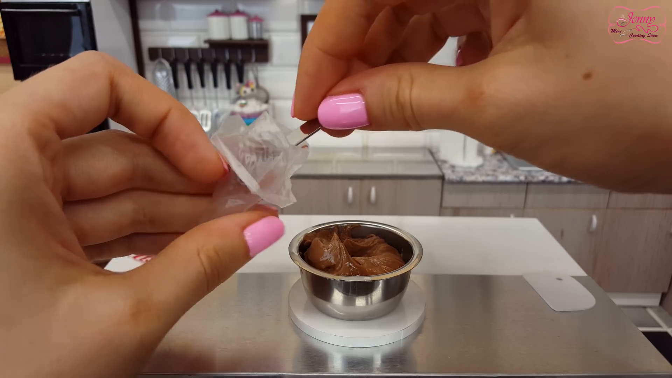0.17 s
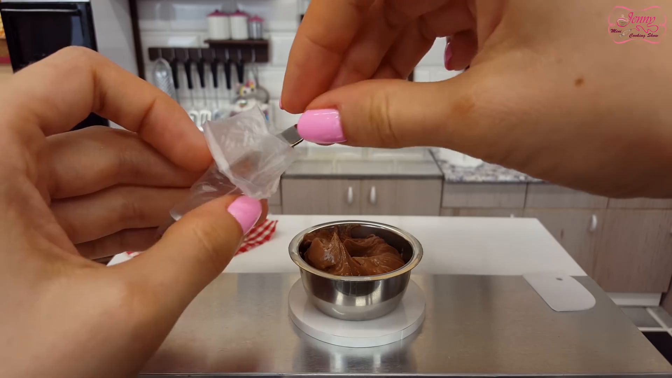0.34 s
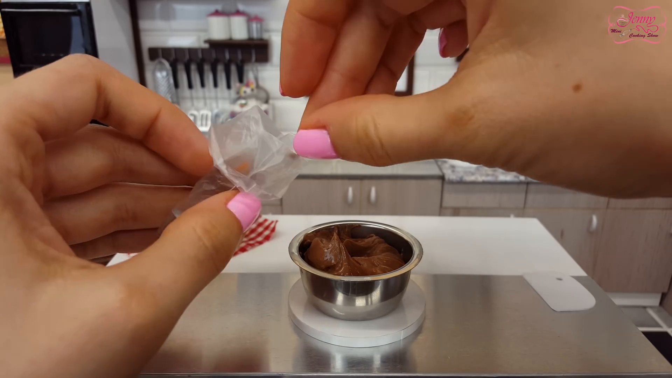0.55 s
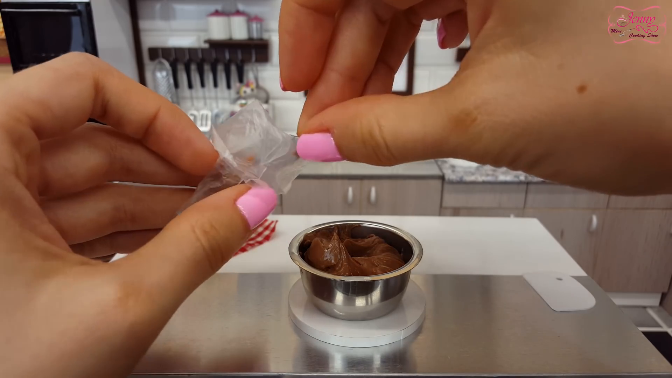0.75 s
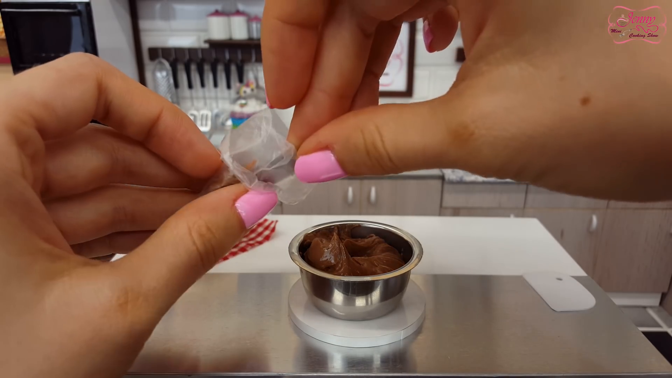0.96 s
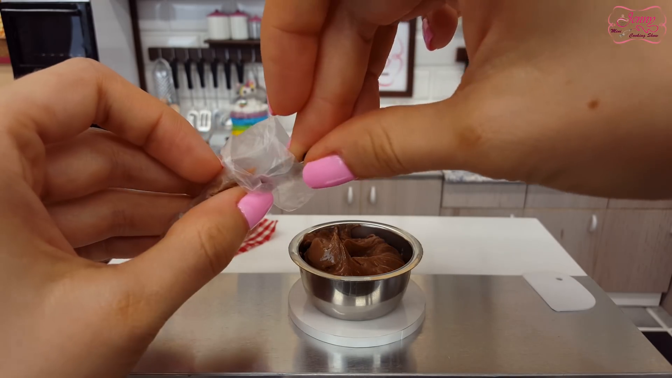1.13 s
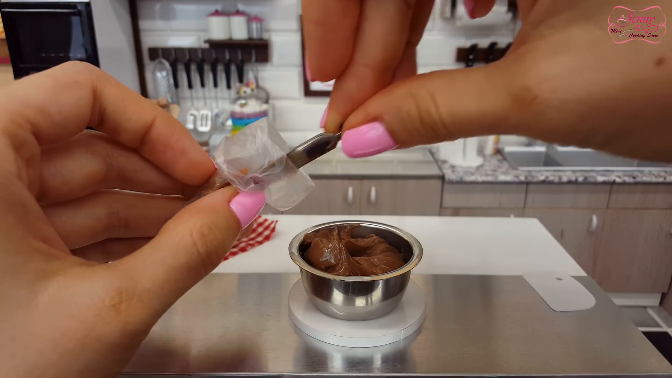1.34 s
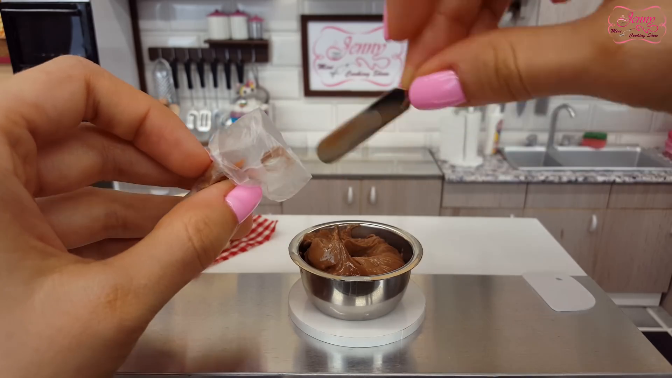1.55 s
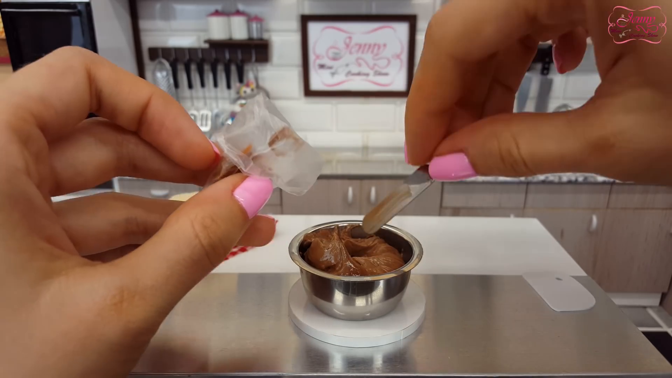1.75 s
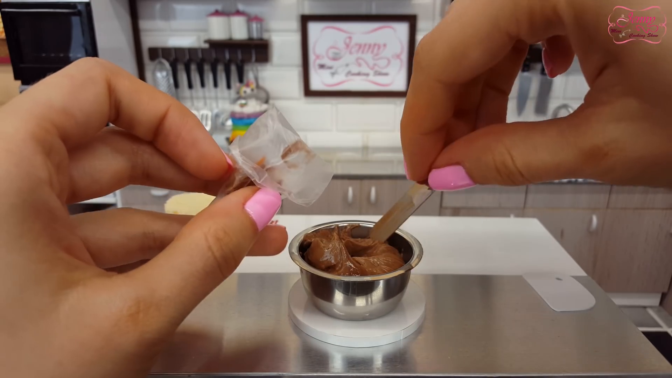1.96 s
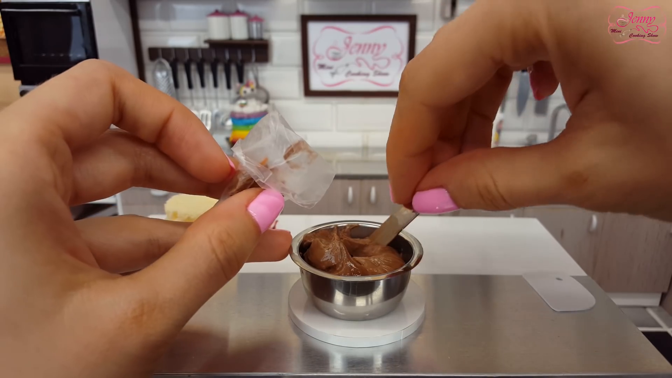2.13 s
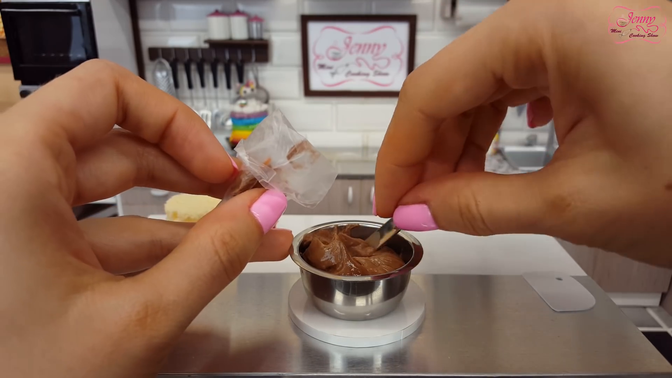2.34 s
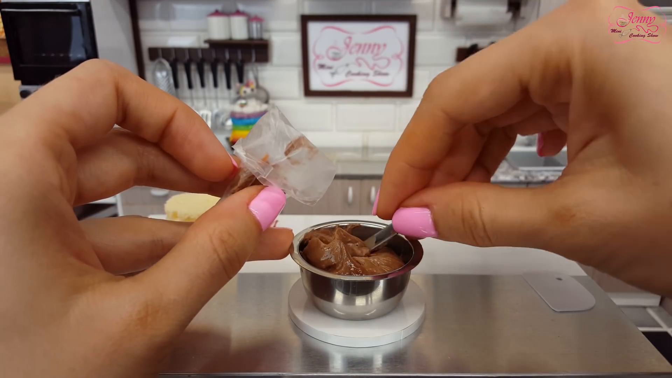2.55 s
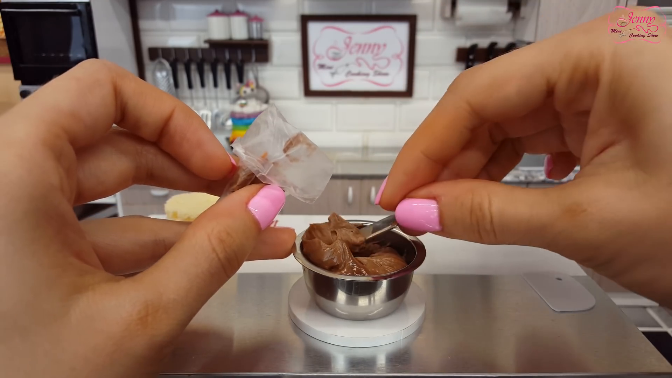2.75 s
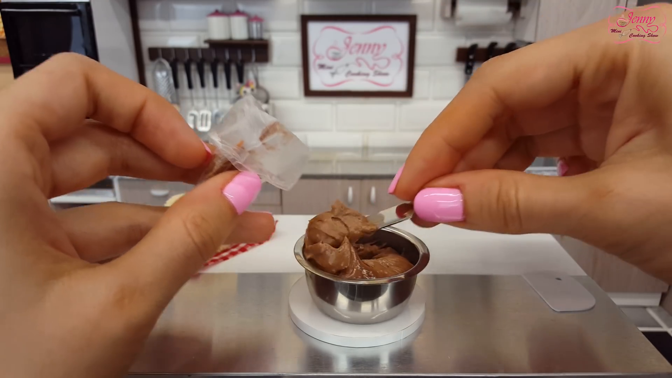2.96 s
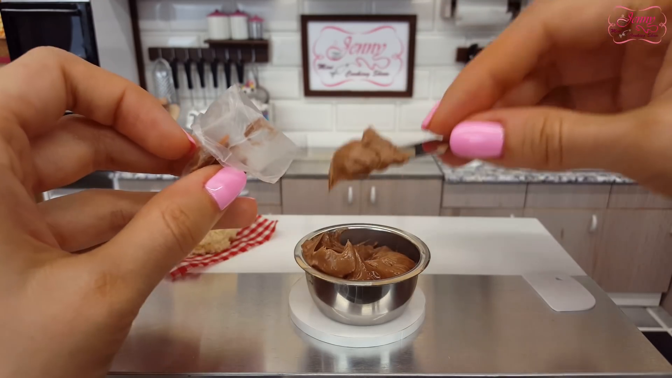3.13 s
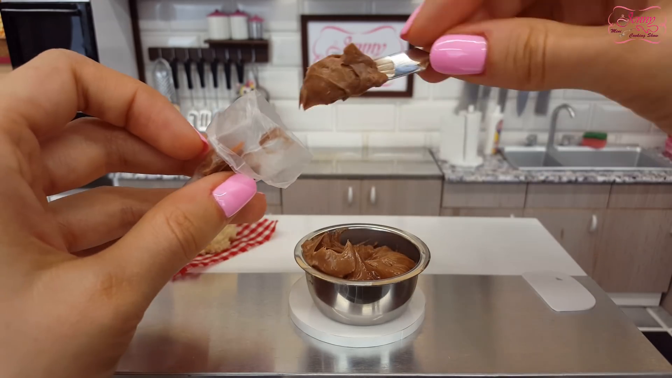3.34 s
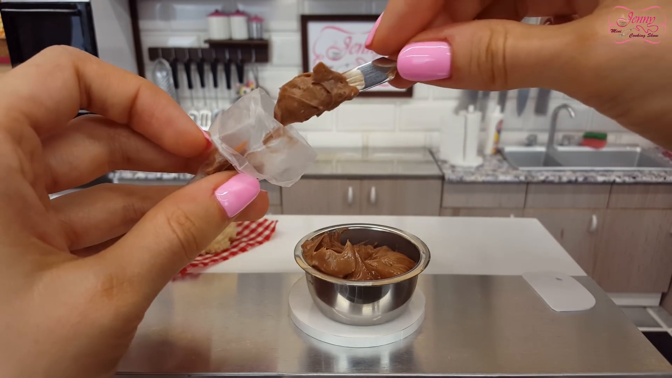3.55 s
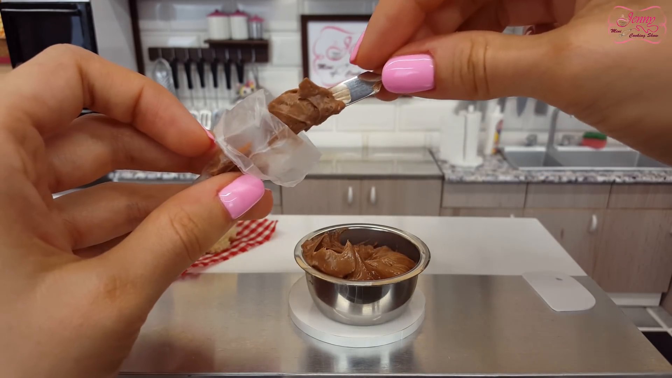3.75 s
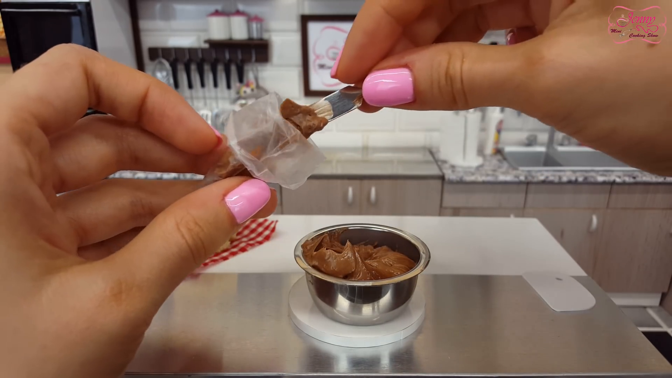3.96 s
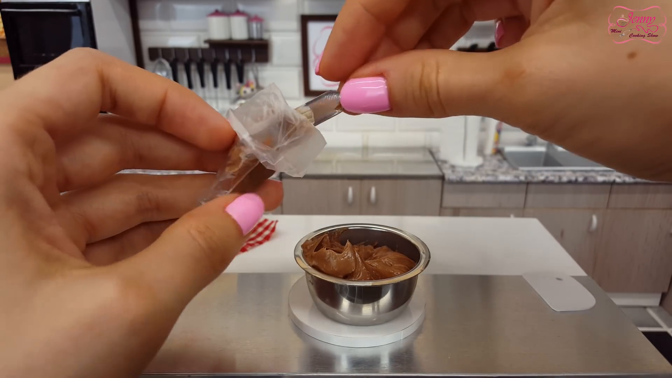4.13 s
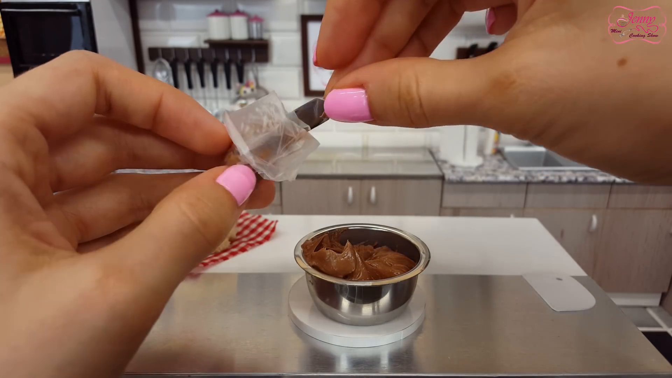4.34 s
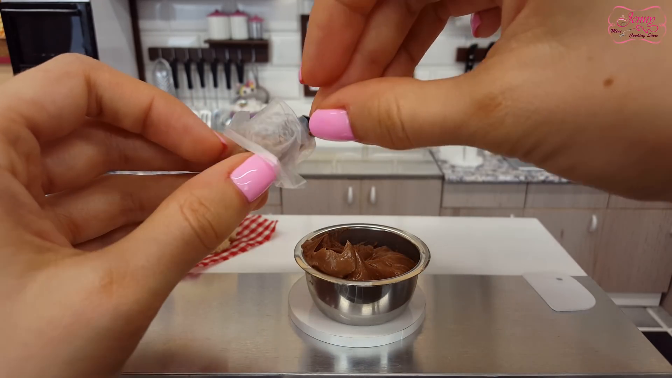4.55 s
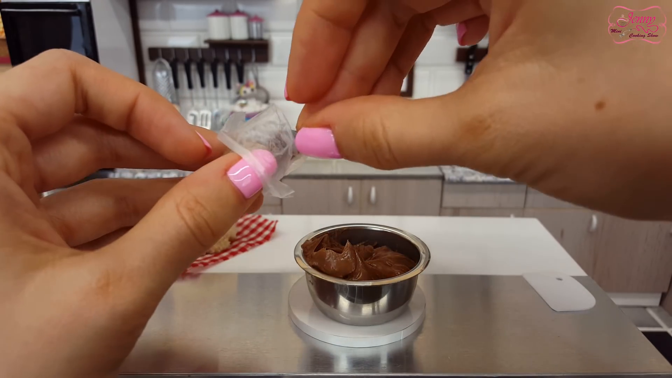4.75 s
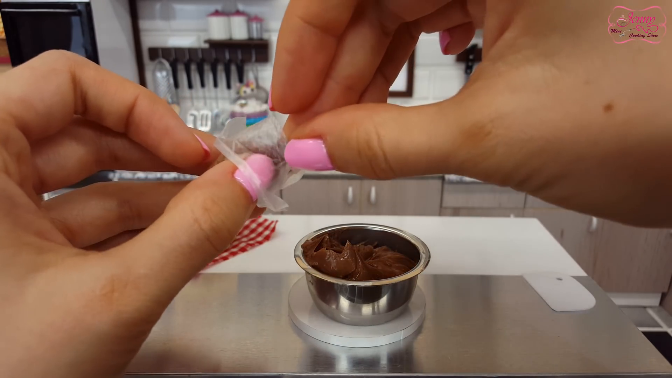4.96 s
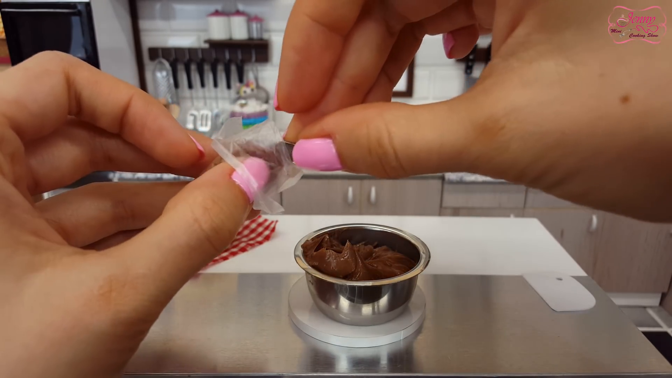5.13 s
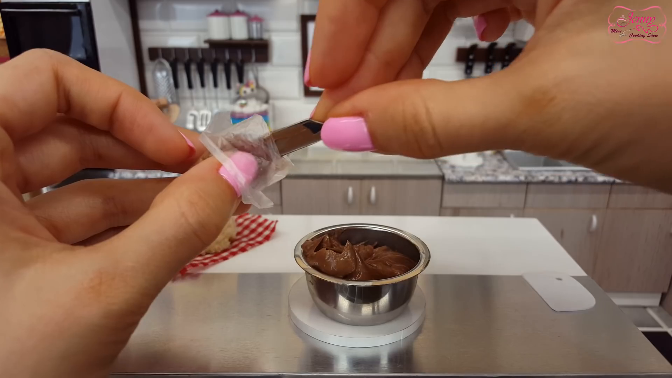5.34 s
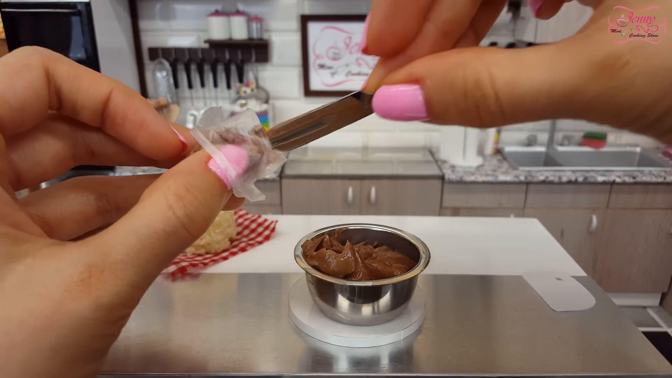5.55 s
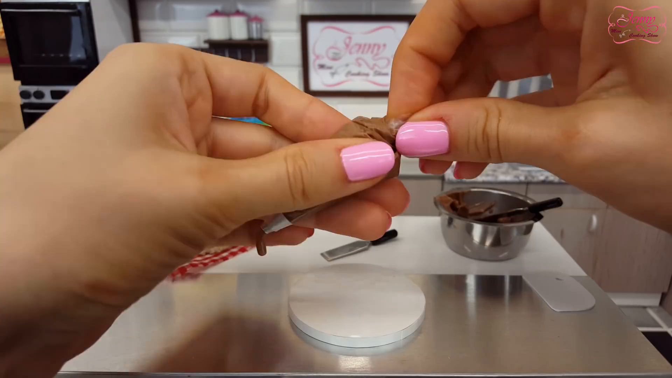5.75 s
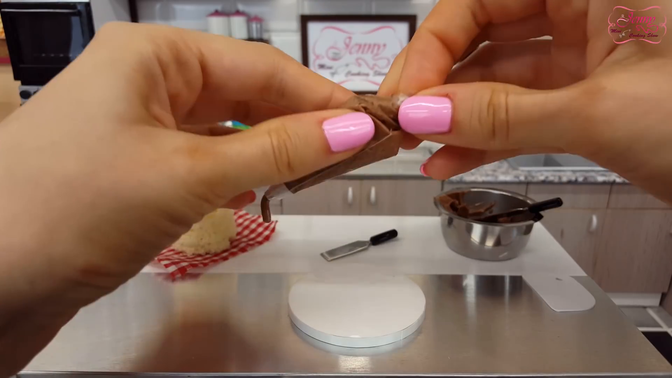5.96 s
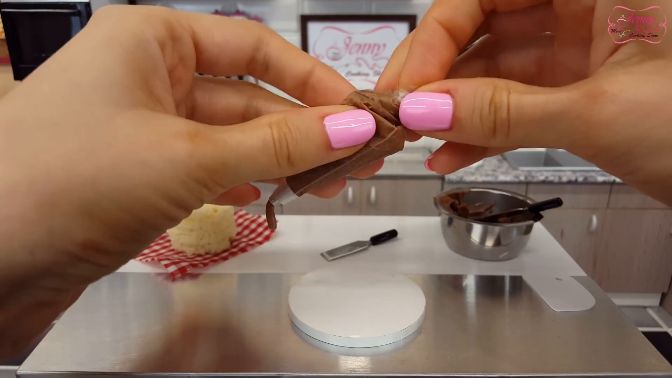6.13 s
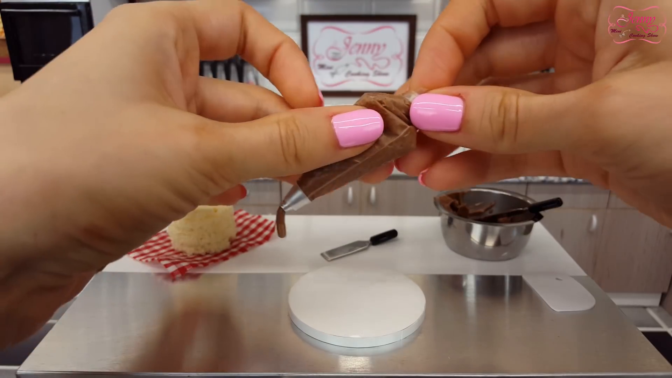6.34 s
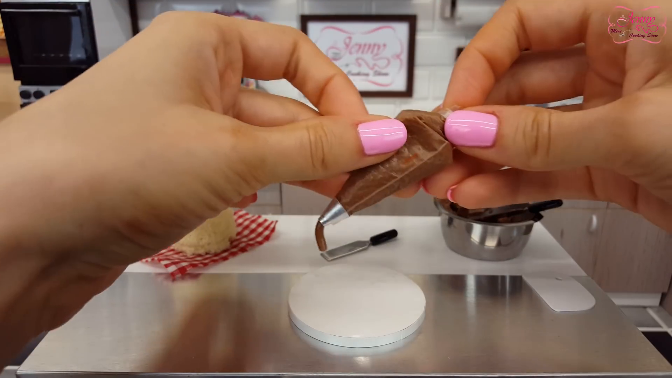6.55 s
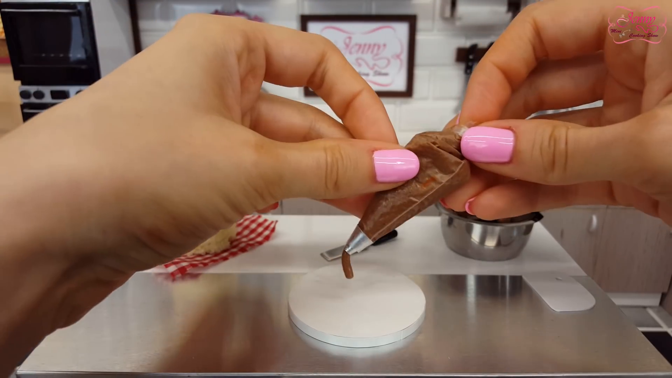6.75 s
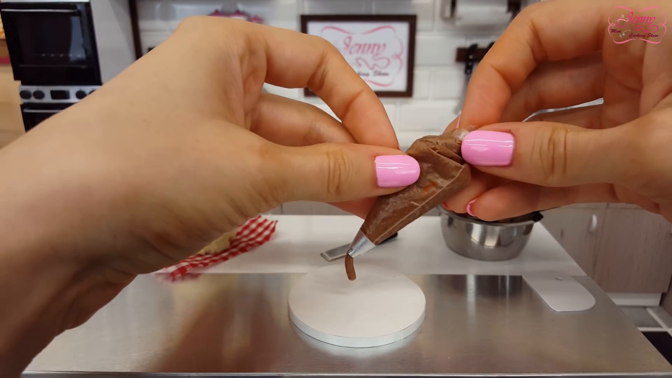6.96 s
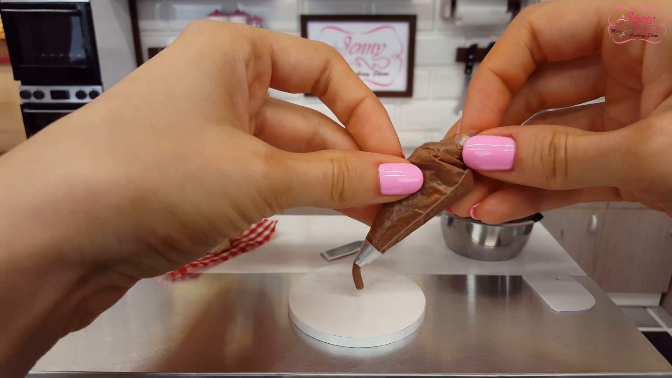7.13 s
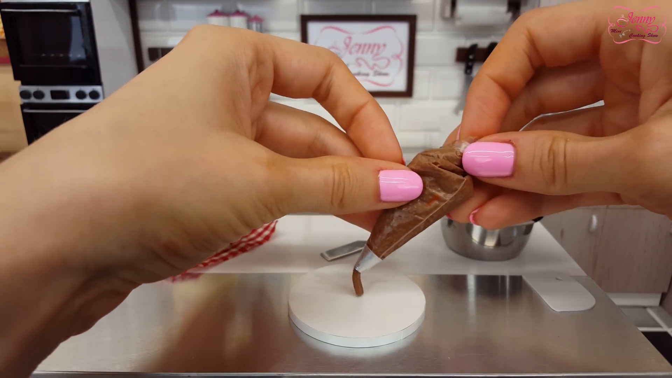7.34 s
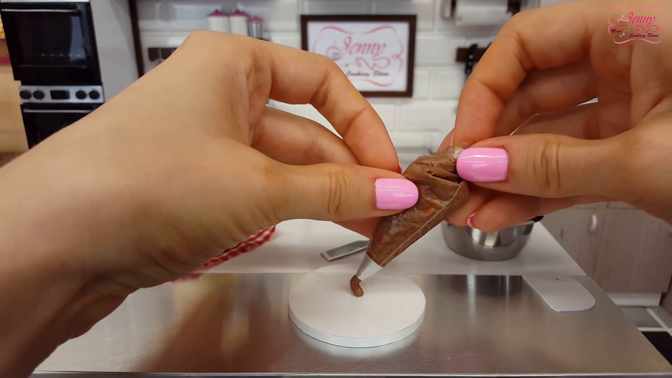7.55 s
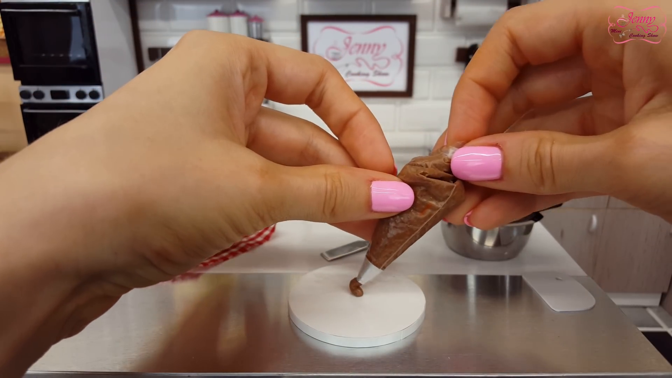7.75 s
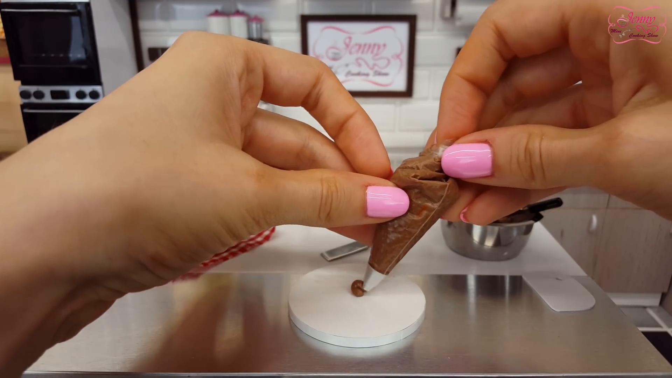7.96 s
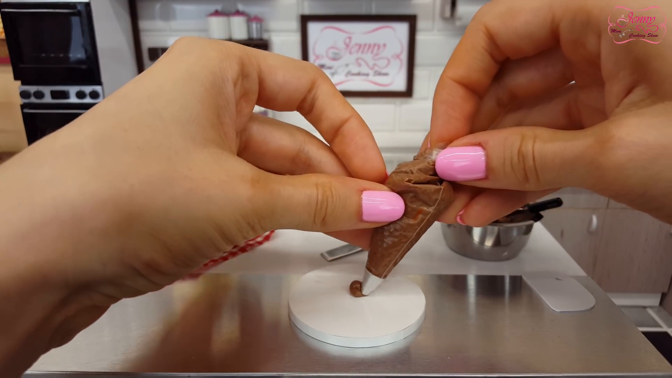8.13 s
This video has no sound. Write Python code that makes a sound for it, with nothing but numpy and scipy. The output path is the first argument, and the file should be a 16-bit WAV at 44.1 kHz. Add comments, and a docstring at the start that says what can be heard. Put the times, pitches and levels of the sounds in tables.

```python
"""A small, thin plastic piping bag crackles close by: its creases snap over, each a crack and a short shiver.
A little steel spatula slides in twice to wipe off a filling: the film rubs and hisses, made of tiny ticks
and smooth noise, small wrinkles give way, and dull knocks are softer flips.
The top is then twisted shut with a few last bright ticks.
Around it a quiet kitchen echoes, with steady coloured noise, a low rumble and faint wavering tones."""
import sys
import numpy as np
from scipy import signal
from scipy.fft import rfft, irfft, next_fast_len
from scipy.io import wavfile
from scipy.ndimage import uniform_filter1d

SR = 44100
rng = np.random.default_rng(int(sys.argv[2]) if len(sys.argv) > 2 else 0)


def pcm_store(signal):
    """Save signal as 16-bit PCM."""
    levels = np.round(np.clip(np.atleast_2d(signal), -1, 1) * 32767)
    wavfile.write(sys.argv[1], SR, levels.astype(np.int16).T)


N = 361203


def amp(db):
    """Turn decibels into gain."""
    return 10 ** (np.asarray(db) / 20)


def unit(x):
    """Scale to an rms of 1."""
    return x / np.sqrt(np.mean(x ** 2) + 1e-20)


def along(points, hz):
    """Read a curve of (frequency, value) points on a log frequency axis."""
    f, v = np.transpose(points)
    return np.interp(np.log(hz + 1), np.log(f + 1), v)


def curves(rows):
    """Draw straight lines between timed rows: one value per sample for each column after the time."""
    s, *cols = np.transpose(rows)
    return [np.interp(np.arange(N) / SR, s, c) for c in cols]


def filtered(x, response):
    """Shape the spectrum of x with a gain that depends on frequency."""
    padded = next_fast_len(N + 8192)
    gain = response(np.fft.rfftfreq(padded, 1 / SR))
    return irfft(rfft(x, padded) * gain, padded)[:N]


def coloured(x, spectrum):
    """Give x the colour of a (frequency, dB) curve, at an rms of 1."""
    return unit(filtered(x, lambda hz: amp(along(spectrum, hz))))


def add(out, s, sound):
    """Mix a sound into out at time s, cut off at the end of out."""
    room = out[round(s * SR):][:len(sound)]
    room += sound[:len(room)]


# colour of the steady room noise: (frequency [Hz], relative level per Hz [dB])
AIR_TONE = [(8, -26), (33, -23), (45, -1), (60, 0), (80, -2), (130, -3.5), (200, -4.5), (300, -8.5),
            (600, -11), (900, -13.5), (1500, -14.5), (2600, -16.5), (4000, -20), (8000, -23.5),
            (15800, -28.5)]
# low rumble that stirs while the hands are busy: (time [s], level [dB])
STIR = [(0, -76), (1.5, -78), (4, -76), (5.8, -84), (8.2, -80)]
# colour of that rumble: (frequency [Hz], relative level per Hz [dB])
STIR_TONE = [(10, -40), (33, 0), (48, -8.5), (90, 0.5), (170, -8), (300, -14.5), (600, -20.5), (2000, -44)]
# steady hum of kitchen appliances: (frequency [Hz], level before the common trim [dB])
HUM = [(48.5, -83), (59.5, -81), (120.5, -83)]
# faint whines, higher up: (frequency [Hz], level before the common trim [dB])
WHINE = [(2401, -88), (2498, -91), (4199, -88.5)]


def background(air_db=-64.28, tone_trim_db=-1.0, waver_hz=0.52):
    """Room noise and handling rumble are coloured noise; appliances are sines whose pitch wavers slightly."""
    t = np.arange(N) / SR
    out = amp(air_db) * coloured(rng.standard_normal(N), AIR_TONE)
    out += amp(curves(STIR)[0]) * coloured(rng.standard_normal(N), STIR_TONE)
    for hz, db in HUM + WHINE:
        waver = unit(uniform_filter1d(rng.standard_normal(N), size=4000))
        cycles = hz * t + waver_hz * np.cumsum(waver) / SR
        out += amp(db + tone_trim_db) * np.sqrt(2) * np.sin(2 * np.pi * cycles)
    return out


# how long the kitchen's tail takes to fall by 60 dB: (frequency [Hz], decay time [s])
KITCHEN_T60 = [(200, 0.29), (1500, 0.47), (4000, 0.34), (8000, 0.34), (15000, 0.22)]


def kitchen(x, early_db=-16.0, tail_db=-17.0, early_t60=0.05, count=6):
    """The steel counter answers within milliseconds, tiles and cupboards with a short tail."""
    out = np.zeros(N)
    t = np.arange(SR // 2) / SR
    # the hands move, so the echoes change every sixteenth of a second,
    # taking turns among a few random patterns
    place = (np.arange(N) // (SR // 16)) % count
    for k in range(count):
        hz, age, z = signal.stft(rng.standard_normal(len(t)), SR, nperseg=256)
        fade = amp(-60 * age / along(KITCHEN_T60, hz)[:, None])
        tail = signal.istft(z * fade, SR, nperseg=256)[1][:len(t)] * (t > .008)
        # cubing the noise leaves a few strong, separate echoes
        early = rng.standard_normal(len(t)) ** 3 * amp(-60 * t / early_t60) * (t > .004)
        echoes = amp(tail_db) * tail / np.linalg.norm(tail)
        echoes += amp(early_db) * early / np.linalg.norm(early)
        out += signal.fftconvolve(x * (place == k), echoes)[:N]
    return out


# resonances of the bag and the hand cupped round it: (centre [Hz], width [Hz], boost [dB])
CUP = [(552, 79, 6.5), (1286, 500, 4), (1630, 390, 5), (2410, 670, 5.5), (2910, 140, 2), (3130, 50, 3),
       (3900, 150, 5.5), (4780, 99, 3), (5380, 180, 4), (6480, 91, 0)]


def cup(hz):
    """The hollow of bag and hand boosts some pitches: the gain in dB at each frequency."""
    return sum(db / (1 + (2 * (hz - centre) / width) ** 2) for centre, width, db in CUP)


def causal(gain):
    """Turn a gain curve into a response that rings only after the blow (minimum phase)."""
    c = irfft(np.log(np.maximum(gain, 1e-6)))
    c[1:len(c) // 2] *= 2
    c[len(c) // 2 + 1:] = 0
    return np.exp(rfft(c))


# where the colour of a flip is set, from thud, body, middle, sheen and edge to the very top: frequency [Hz]
TONE_HZ = [500, 1400, 2900, 5600, 10500, 16000]
# broad colour that all flips share: (frequency [Hz], gain [dB])
PRESENCE = [(60, -27), (200, -3.5), (430, 0.5), (700, -1.5), (850, -7.5), (1050, -4), (1900, -4.5),
            (3500, -1), (7000, 0), (8500, 3), (12000, -0.5), (15500, -5.5)]


def flip(db, facet_hz, weight_db, crisp_db, t60, crack=3.1, ring_db=9.0, ring_width_hz=90,
         ring_share=0.097, body_db=5.0, body_share=0.38, sheen_db=2.5, sheen_share=0.4, roll_off=0.32,
         size=4096):
    """One sharp crack; the film shivers for milliseconds, most at the pitch of the flipped facet."""
    t, hz = np.arange(size) / SR, np.fft.rfftfreq(size, 1 / SR)
    shiver = rng.standard_normal(size) * amp(-60 * t / t60)
    shiver[0] = crack
    z = rfft(shiver)
    # dividing by this smoothed spectrum evens out the shiver before it is coloured
    broad = np.sqrt(np.abs(uniform_filter1d(np.abs(z) ** 2, size=61)))
    # weight sets everything below the middle, crispness everything above
    body = body_db + body_share * weight_db
    sheen = sheen_db + sheen_share * crisp_db
    top = crisp_db + roll_off * min(crisp_db, 0)  # a soft flip keeps falling towards the top
    colour = [weight_db, body, 0, sheen, crisp_db, top]
    tone = along(list(zip(TONE_HZ, colour)), hz) + along(PRESENCE, hz) + cup(hz)
    facet = 1 / (1 + ((hz - facet_hz) / (ring_width_hz + ring_share * facet_hz)) ** 2)
    snap = irfft(z * causal(amp(tone + ring_db * facet) / broad))
    span = .008 * SR  # the level counts all the energy as if spread over 8 ms
    return amp(db) * np.sqrt(span / size) * unit(snap)


# the spatula knocks dully against the filled bag or the bowl: (time [s], level [dB], pitch [Hz])
KNOCKS = [(0.516, -48.5, 400), (1.3288, -42, 1230), (1.8049, -48, 260), (1.8097, -52.5, 270),
          (2.433, -61, 1400), (2.592, -56, 1610), (3.273, -62, 595), (4.2861, -58, 1700),
          (4.5194, -51.5, 1470), (4.6207, -57, 1250), (5.499, -52, 1380), (5.6342, -49, 1580),
          (5.6835, -55.5, 557)]
# all knocks are heavy and soft
KNOCK_T60_S, KNOCK_WEIGHT_DB, KNOCK_CRISP_DB = 0.02, 8.5, -14


def knocks():
    """The spatula bumps, cushioned by filling and fingers: heavy flips with little treble."""
    out = np.zeros(N)
    for s, db, hz in KNOCKS:
        knock = flip(db, hz, KNOCK_WEIGHT_DB, KNOCK_CRISP_DB, KNOCK_T60_S,
                     ring_db=11.0, ring_width_hz=30, ring_share=0.25, body_db=0.0)
        add(out, s, knock)
    return out


# a stroke of steel or fingers along the film:
# (start [s], length [s], rub before its trim [dB], hiss before its trim [dB], scrape pitch [Hz])
STROKES = [(0.202, 0.19, -54, -52, 8400), (0.423, 0.093, -47.5, -47.5, 7040), (0.603, 0.14, -47, -51, 6300),
           (0.816, 0.22, -50.5, -56, 5600), (1.127, 0.19, -58, -62.5, 5000),
           (1.484, 0.031, -52.5, -48.5, 5800), (1.597, 0.37, -71, -76, 6000), (2.4, 0.67, -77, -79, 7200),
           (4.148, 0.063, -60, -60, 9600), (4.26, 0.14, -67.5, -86, 7600), (4.484, 0.11, -59, -58.5, 8600),
           (4.602, 0.059, -54.5, -57, 5900), (4.733, 0.19, -57.5, -70, 5500), (4.88, 0.2, -51, -63, 4900),
           (5.266, 0.19, -67, -62.5, 8200), (5.54, 0.2, -64.5, -64.5, 6300),
           (5.922, 0.048, -74, -57.5, 11000), (6.05, 0.26, -74, -69, 10500)]
STROKE_ATTACK_S, STROKE_RELEASE_T60_S = 0.057, 0.35  # a stroke takes hold, then the film relaxes


def strokes():
    """Pressure on the film as gains of the dull rub and the hiss: each stroke swells, holds and dies away."""
    rub_power, hiss_power = np.zeros(N), np.zeros(N)
    for start, length, rub_db, hiss_db, _ in STROKES:
        t = np.arange(int((length + STROKE_RELEASE_T60_S) * SR)) / SR
        swell = np.minimum(t / STROKE_ATTACK_S, 1)
        release = amp(-60 * np.maximum(t - length, 0) / STROKE_RELEASE_T60_S)
        pressure = swell * release
        add(rub_power, start, (amp(rub_db) * pressure) ** 2)
        add(hiss_power, start, (amp(hiss_db) * pressure) ** 2)
    return np.sqrt(rub_power), np.sqrt(hiss_power)


def scraped(x, scrape_db=7.0, scrape_octaves=0.29, patchy_db=3.0):
    """The taut film favours one pitch, gliding from stroke to stroke; its colour shifts as the contact moves."""
    hz, t, z = signal.stft(x, SR, nperseg=512)
    start, length, _, _, stroke_hz = np.transpose(STROKES)
    pitch = np.interp(t, start + length / 2, stroke_hz)
    octaves_away = np.log2((hz[:, None] + 1) / pitch)
    peak = scrape_db / (1 + (octaves_away / scrape_octaves) ** 2)
    # random patches, smoothed over frequency and then over time
    patches = uniform_filter1d(rng.standard_normal(z.shape), size=6, axis=0)
    patches = unit(uniform_filter1d(patches, size=6, axis=1))
    return unit(signal.istft(z * amp(peak + patchy_db * patches), SR, nperseg=512)[1][:N])


def slips(rate, spread_db, smooth, t60=0.0084, size=512, count=6):
    """Film sticks and slips: uneven ticks in a few random colours, on a bed of smooth friction noise."""
    out = np.zeros(N)
    for k in range(count):
        sizes = amp(spread_db * (2 * rng.random(N) - 1))
        ticks = (rng.random(N) < rate / count / SR) * sizes
        shiver = rng.standard_normal(size) * amp(-60 * np.arange(size) / SR / t60)
        out += signal.oaconvolve(ticks, shiver - shiver.mean())[:N]
    return unit(out) + smooth * rng.standard_normal(N)


# dull part of the sliding film: (frequency [Hz], relative level per Hz [dB])
RUB_TONE = [(40, -28), (230, 4), (600, 5), (850, 1.5), (1500, 5), (2200, 3), (3800, 6.5), (6000, -23.5),
            (16000, -48)]
# bright part of the sliding film: (frequency [Hz], relative level per Hz [dB])
HISS_TONE = [(1000, -52), (3000, -23), (4200, 2.5), (6000, 0), (8500, -4), (11500, -5), (16000, -15)]


def rubbing(rub, hiss, rub_trim_db=-9.5, hiss_trim_db=-7.0):
    """The blade drags along the film while fingertips shift on its outside: dull and bright slips."""
    dull = scraped(coloured(slips(rate=500, spread_db=8, smooth=0.7), RUB_TONE))  # rate in ticks per s
    bright = scraped(coloured(slips(rate=800, spread_db=9, smooth=0.7), HISS_TONE))
    both = amp(rub_trim_db) * rub * dull + amp(hiss_trim_db) * hiss * bright
    return filtered(both, lambda hz: amp(cup(hz)))


# small wrinkles that give way during a stroke: how often, level against the rub and its random spread
WRINKLES_PER_S, WRINKLE_DB, WRINKLE_SPREAD_DB = 70, -5, 6.0
# their middle pitch and its random spread, then their colour and decay
WRINKLE_HZ, WRINKLE_OCTAVES = 4180, 0.86
WRINKLE_WEIGHT_DB, WRINKLE_CRISP_DB, WRINKLE_T60_S = -8, -9, 0.01


def wrinkles(rub, count=14):
    """Small wrinkles of a few random pitches flip at random, louder the harder the stroke rubs."""
    out = np.zeros(N)
    flips_each = int(WRINKLES_PER_S * N / SR / count)
    for pitch in rng.standard_normal(count):
        tick = flip(WRINKLE_DB, WRINKLE_HZ * 2 ** (WRINKLE_OCTAVES * pitch), WRINKLE_WEIGHT_DB,
                    WRINKLE_CRISP_DB, WRINKLE_T60_S, size=2048)
        # "when" is a share of the whole length
        for when, strength in rng.random(size=(256, 2))[:flips_each]:
            uneven = amp(WRINKLE_SPREAD_DB * (2 * strength - 1.5))  # from -9 to +3 dB
            add(out, when * N / SR, rub[int(when * N)] * uneven * tick)
    return out


# a larger crease snaps over; weight is how much it shakes the whole bag:
# (time [s], level [dB], pitch of its facet [Hz], weight [dB], crispness [dB])
SNAPS = [(0.1002, -43.5, 3600, -21, -12), (0.237, -47, 2450, -4, -30), (0.245, -37.5, 3650, -7, -10.5),
         (0.2515, -37.5, 1810, -10, -23), (0.2916, -41, 2400, -11, -5), (0.3043, -41, 6480, 4, 2),
         (0.347, -53, 7880, -10, 9), (0.485, -44, 2390, -39, -15), (0.5366, -42, 5050, 7, -8),
         (0.5674, -45.5, 1720, 0, -34), (0.6342, -45.5, 2350, -17, -27), (0.6527, -39, 1700, 1, -4.5),
         (0.6802, -31.5, 6310, -22, -7.5), (0.7081, -42, 1770, -7, -15), (0.7432, -41.5, 2280, -15, -21),
         (0.757, -44.5, 6500, -3, -10), (0.8329, -45, 6420, -21, -12), (0.8397, -35.5, 5560, -2, -3.5),
         (0.8521, -39, 8200, -18, -7), (0.8851, -27, 5070, -11, -4.5), (0.9033, -31.5, 4800, -8, -9),
         (0.9222, -35.5, 8700, -7, -5), (0.941, -46, 4690, -3, -14), (0.9665, -45, 4780, -7, -18),
         (0.9707, -33.5, 1340, -9, -8), (0.9866, -37.5, 3900, -11, -4), (0.9913, -29.5, 5930, 1, -6),
         (1.0114, -41, 8910, -13, -4), (1.018, -32.1, 7840, -43, -9), (1.0408, -39, 2410, -5, -12),
         (1.1166, -45.5, 5730, -11, -10), (1.138, -41.5, 2430, -2, -27), (1.1448, -43, 2350, -2, -5),
         (1.155, -30, 2980, -21.5, -13.5), (1.1969, -45.5, 5730, -16, -9), (1.2027, -45.5, 3900, -4, -3),
         (1.278, -49.5, 10800, -8, 0), (1.2884, -48, 3500, -17, -8), (1.3075, -49.5, 5200, 1, -7),
         (1.516, -51.5, 2240, -17, -13), (1.5348, -38, 6550, -2.5, -3), (1.549, -39.5, 2670, -9, -15),
         (1.584, -43.5, 1330, -4, -34), (1.6664, -41, 2300, 0, -19.5), (1.7718, -46, 2750, -20, -16.5),
         (1.822, -41, 4600, -28, -12), (2.5614, -67, 11410, -8, 2), (2.7417, -57, 7160, -17, 1),
         (2.921, -63.5, 5200, -7, -4), (4.149, -54.4, 2840, -35, -28), (4.1713, -49.5, 2720, -33, -12),
         (4.2307, -49, 1370, -6, -17), (4.303, -49, 2270, -10, -51), (4.5635, -48, 2420, -8, -10),
         (4.5715, -46, 8200, -10, -9), (4.5827, -47, 5380, 0, 6), (4.6914, -42, 4050, -12, -1.5),
         (4.716, -35.5, 7160, -6, -0.5), (4.7288, -36.5, 2770, -19, -2.5), (4.7459, -51.5, 8100, -4, 6),
         (4.7986, -41.5, 5000, -22, -9), (4.8086, -45, 4070, -14, -7), (4.846, -50, 1940, -4, -10),
         (4.893, -49, 5300, -26, -20), (4.898, -39.5, 2940, -15, -2.5), (4.9119, -42, 2880, -16, -4),
         (4.927, -42, 9470, -7, 0), (4.9348, -31, 4200, -7.5, -19), (4.9635, -42, 9700, 3, 15),
         (4.996, -45, 2350, 1, -5), (4.9994, -45.5, 1280, -6, -7), (5.0149, -43.4, 8980, -20, -5),
         (5.0344, -43.6, 3800, -17, 2), (5.0397, -41, 5200, -18, -20), (5.0441, -36, 5080, -20, -26),
         (5.056, -38.5, 3900, -14, -10), (5.0694, -35.5, 1680, -11, -8.5), (5.0782, -35, 2750, -22, -15),
         (5.1047, -34, 4200, -20.5, -33), (5.2198, -45.5, 8900, -16, -11.5), (5.3057, -42, 5200, -28, -9),
         (5.327, -30, 3200, -36, -5), (5.7119, -49, 9020, -25, 3), (5.7495, -55.5, 5320, -22, 4),
         (5.99, -40, 10900, -15, 4), (6.1206, -43.8, 12500, -49, -3.5), (6.231, -57, 2400, -5, -22),
         (6.2826, -53.5, 9700, -29, -1), (6.3364, -47.5, 6600, -39, 3)]
EMPTY_T60_S, FILLED_T60_S = 0.015, 0.0115  # the filling damps the film's shiver
FILLED_AT_S = 5.5  # the last of the filling is in the bag
T60_DOUBLES_PER_DB, MIDDLING_SNAP_DB = 0.0151, -42  # a harder snap shivers longer


def snaps():
    """The larger creases flip one by one, more drily as the bag fills."""
    out = np.zeros(N)
    for s, db, facet_hz, weight_db, crisp_db in SNAPS:
        t60 = np.interp(s, [0, FILLED_AT_S], [EMPTY_T60_S, FILLED_T60_S])
        t60 *= 2 ** (T60_DOUBLES_PER_DB * (db - MIDDLING_SNAP_DB))
        add(out, s, flip(db, facet_hz, weight_db, crisp_db, t60))
    return out


def scene():
    """The bag close by, the kitchen around it."""
    rub, hiss = strokes()
    bag = snaps() + knocks() + wrinkles(np.hypot(rub, hiss)) + rubbing(rub, hiss)
    return (bag + kitchen(bag) + background())[None]


TOP_HZ = 15950  # upper band limit


def record(dry):
    """Cut the sound off steeply above the band limit."""
    return np.array([filtered(x, lambda hz: 1 / np.sqrt(1 + (hz / TOP_HZ) ** 200)) for x in dry])


dry = scene()
out = record(dry)
pcm_store(out)
```